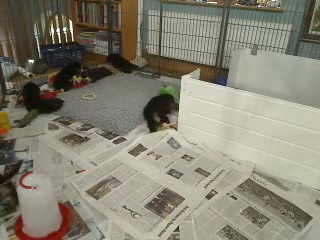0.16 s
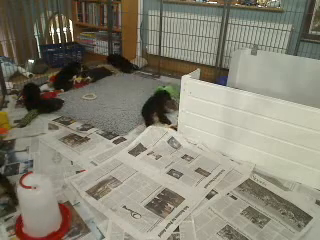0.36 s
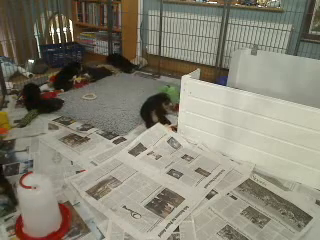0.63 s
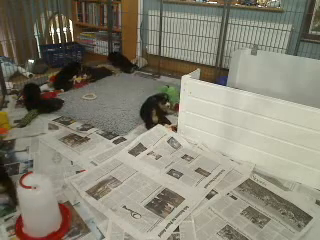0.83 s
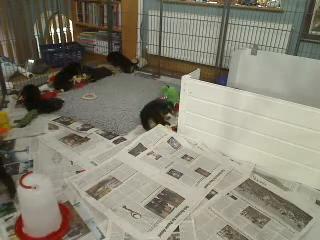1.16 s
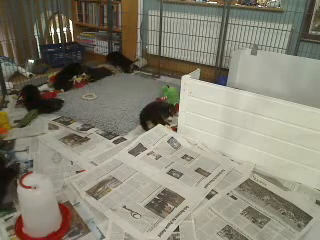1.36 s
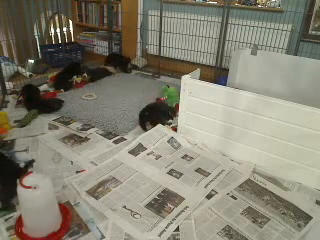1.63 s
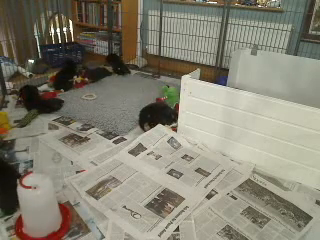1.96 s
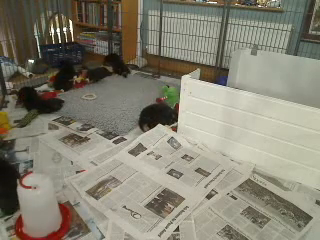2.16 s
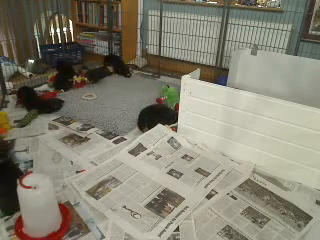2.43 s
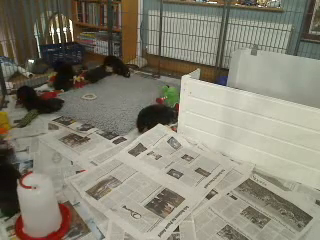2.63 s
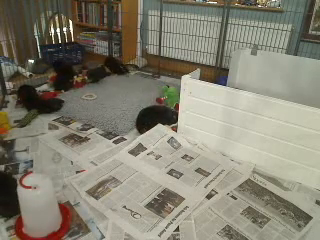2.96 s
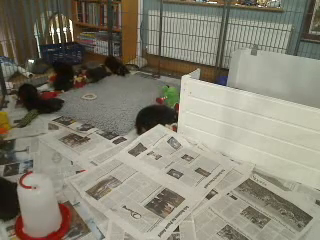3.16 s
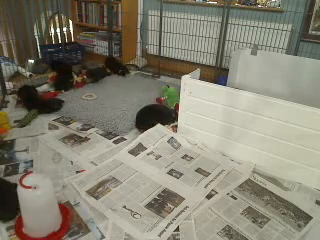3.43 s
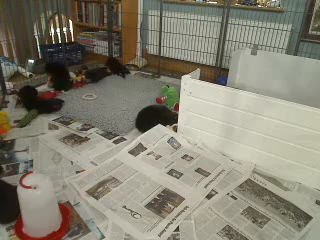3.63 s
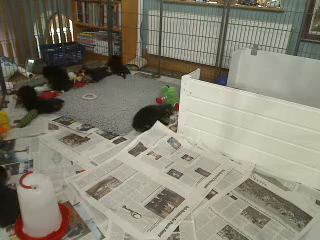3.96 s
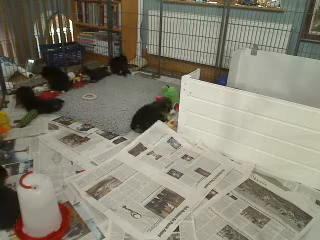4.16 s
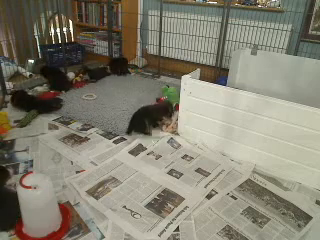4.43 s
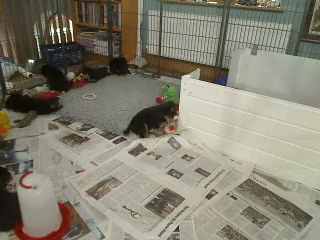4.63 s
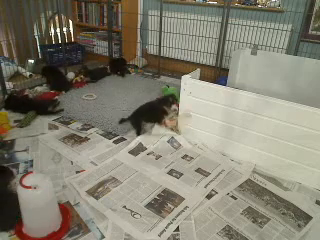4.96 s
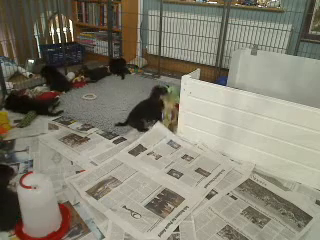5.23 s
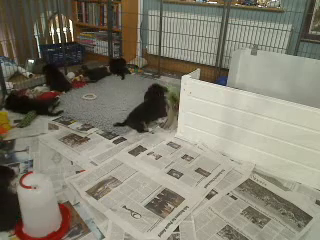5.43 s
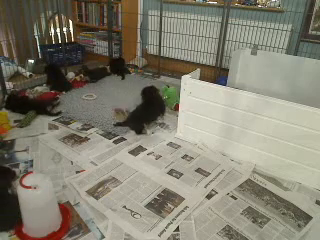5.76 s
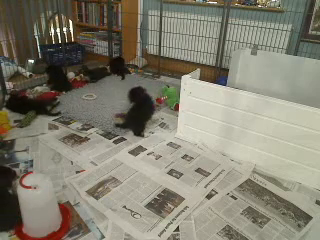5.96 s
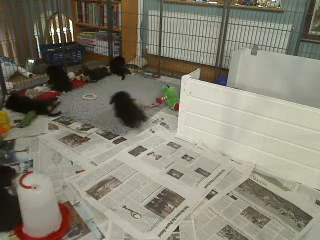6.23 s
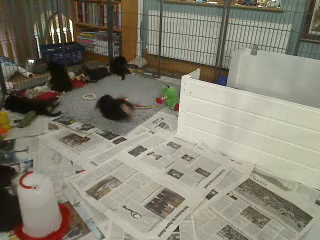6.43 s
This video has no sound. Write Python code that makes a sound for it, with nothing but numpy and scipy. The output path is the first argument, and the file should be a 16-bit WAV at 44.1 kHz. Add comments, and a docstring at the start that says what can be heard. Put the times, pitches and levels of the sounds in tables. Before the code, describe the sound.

Newspaper rustles and snaps under small paws as a puppy gives thin whines, one piercing falling yelp, a short moan and two low whimpers indoors.

```python
"""In a pen in a furnished room a young puppy cries six times: two whines, a loud yelp that cracks and slides down,
a moan and two low whimpers. Each cry is a sum of vocal-fold harmonics shaped by mouth and throat resonances.
Paws scuff the newspaper on the floor (coloured grains and friction noise), with snaps and knocks (resonant bursts).
The litter stirs softly (coloured noise) over steady room tone and a faint mains hum (a sine)."""
import sys
import numpy as np
from scipy import signal
from scipy.fft import rfft, irfft, next_fast_len
from scipy.io import wavfile
from scipy.ndimage import uniform_filter1d, map_coordinates

SR = 44100
rng = np.random.default_rng(int(sys.argv[2]) if len(sys.argv) > 2 else 0)


def bounce(signal):
    """Save signal as a 16-bit WAV file at the path given by the first command-line argument."""
    frames = np.transpose(np.atleast_2d(signal))
    limited = np.clip(frames, -1, 1)
    pcm = np.round(limited * 32767).astype(np.int16)
    wavfile.write(sys.argv[1], SR, pcm)


N = 290089
TIME = np.arange(N) / SR

# Spectrum of the room tone. Each row: frequency in Hz, relative density in dB per Hz.
AIR = [(30, -45.5), (55, -17.5), (75, -17.5), (120, -14), (180, -5.5), (300, -1.5), (600, -8.5),
       (1200, -11), (2500, -21.5), (5000, -32.5), (10000, -41)]
AIR_DB = -67.5
HUM_HZ, HUM_DB = 99.5, -70.5

# The rest of the litter stirring on blanket and paper. Each row: time in seconds, level in dB before flicker.
STIR = [(0, -62.5), (.6, -64), (.8, -68.5), (1.2, -61.5), (1.7, -65), (4.2, -60.5), (5.45, -62.5),
        (5.75, -69.5), (5.97, -70.5), (6.58, -60)]
# Spectrum of the stirring. Each row: frequency in Hz, relative density in dB per Hz.
STIR_COLOUR = [(30, -54), (60, -26), (130, -3.5), (200, 1.5), (280, -4.5), (400, 1), (700, -3), (1300, -10),
               (2500, -13.5), (4500, -16), (7000, -21.5), (10000, -36.5)]

# Reverberation of the room. Each row: frequency in Hz, time to decay by 60 dB in seconds.
ROOM_T60 = [(500, 0.37), (1500, 0.39), (4000, 0.25), (9000, 0.047)]

# Soft knocks of paws and toys. Each row: start in seconds, peak of the direct sound in dB, centre in Hz.
KNOCKS = [(.333, -45, 1480), (1.135, -53, 158), (2.345, -47.5, 840), (4.01, -52, 230), (4.426, -53, 180),
          (5.219, -54, 170)]
# Single snaps of the paper. Each row: start in seconds, peak of the direct sound in dB, centre in Hz.
SNAPS = [(.0375, -41.5, 4230), (.4485, -43, 2030), (.8907, -46.5, 4320), (1.4706, -42, 2990),
         (1.8677, -46.5, 3660), (4.149, -46, 2745), (4.559, -46, 2780), (4.684, -43.5, 4720),
         (4.861, -39.5, 2680), (5.2206, -52, 2260), (5.2804, -44, 4110), (6.3723, -32.5, 5660),
         (6.3807, -32.5, 5740), (6.4094, -33, 2930)]
# Spectrum of rubbed newspaper, before tilt. Each row: frequency in Hz, relative density in dB per Hz.
PAPER = [(290, -37.5), (500, -15), (1050, -9.5), (1640, -4), (1980, -2.5), (2670, 1.5), (2990, -2.5),
         (3930, -1), (5370, -4), (5790, -4), (9910, -15), (12900, -70), (21800, -120)]
# Paw strokes on newspaper. Each row: peak time in seconds, level at the peak in dB, swell in seconds,
# fade in seconds (both to 20 dB down), crispness as treble tilt in dB per octave.
STROKES = [(.008, -49, 0.13, 0.095, -3.5), (.228, -61.5, 0.038, 0.0544, 3.5), (.362, -65, 0.035, 0.1, 0),
           (0.465, -52.5, 0.061, 0.047, 0.5), (.575, -62.5, 0.1, 0.18, -5), (1.426, -60, 0.014, 0.034, 12),
           (1.484, -47.5, 0.031, 0.044, -0.5), (1.575, -52.5, 0.031, 0.029, 1),
           (1.782, -59, 0.017, 0.037, 1), (4.26, -67, 0.21, 0.059, 8.5), (4.395, -60.5, 0.071, 0.099, 5),
           (4.566, -47.5, 0.019, 0.035, -2.5), (4.87, -50, .1, .12, 1), (4.974, -50, 0.029, 0.028, .5),
           (5.15, -72.5, .1, 0.16, 5), (5.312, -53.5, 0.078, .06, -5), (5.48, -72.5, 0.14, 0.22, 5.5),
           (6.009, -63, .015, 0.12, 1), (6.205, -69.5, .02, 0.023, 24), (6.33, -58.5, 0.068, .08, 10.5),
           (6.379, -39.5, 0.031, 0.1, 2.5), (6.421, -48.5, 0.029, 0.078, -0.5)]

# Main resonance of the mouth. Each row: frequency in Hz before the shift of the cry, relative gain in dB.
MOUTH = [(850, -10.5), (1050, -3), (1350, 7.5), (1550, -1.5), (1750, -9), (2000, -30.5), (2400, -27.5),
         (3500, -96.5)]
# Upper resonances of the throat. Each row: frequency in Hz, relative gain in dB.
EDGE = [(1900, -41.5), (2600, -18.5), (3000, -2.5), (3500, 2.5), (4200, 3), (4700, 2), (5250, 2),
        (5800, -5.5), (6700, -19), (7300, -40), (9000, -76)]
# Spectrum of the rasp of the voice. Each row: frequency in Hz, relative density in dB per Hz.
RASP = [(600, -46), (1000, -19), (1500, 9), (1800, -1.5), (2300, 5), (2700, -3.5), (3300, -5), (4400, 3.5),
        (5200, -32), (6800, -7.5), (7600, -56.5), (10000, -64)]

# The course of each of the six cries. Each row: time in seconds, pitch in Hz, level in dB before the common
# trim in puppy(), mouth opening as overtones over fundamental in dB.
FALLING_WHINE = [(1.01, 763, -64, -6), (1.055, 824, -58, 2), (1.07, 873, -49.5, -4), (1.098, 837, -62.5, 0),
                 (1.12, 780, -42.5, -3), (1.165, 648, -48.5, -11), (1.232, 513.5, -44.5, -4.5),
                 (1.41, 500.6, -44.5, -10.5), (1.485, 443.7, -48, 3)]
THIN_WHINE = [(1.875, 754, -50.5, 11), (1.92, 850, -51.5, 3), (1.99, 930, -55, -0.5),
              (2.025, 847, -35, 6.5), (2.075, 800, -45, 16.5), (2.17, 813.6, -45, 3.5),
              (2.195, 742.5, -52, -1.5), (2.222, 803, -48.5, -8)]
YELP = [(2.428, 1054, -36.5, 11.5), (2.448, 1093, -28, 3.5), (2.468, 1200, -24, 11), (2.493, 1113, -41, -4),
        (2.52, 1105, -29.5, 9.5), (2.55, 997, -27.5, 19), (2.65, 888.5, -31, 9), (2.74, 854, -29, 5.5),
        (2.8, 834, -43.5, 2.5), (2.84, 785.5, -30.5, -6), (2.9, 745.7, -37.5, -1),
        (2.96, 734.3, -31, -14.5), (3.0, 671, -39, -3), (3.05, 617, -35.5, -13.5),
        (3.12, 568.6, -49, -17.5)]
MOAN = [(3.315, 681, -51, -1), (3.37, 861, -45.5, -12), (3.42, 707, -42.5, -8), (3.458, 667.6, -38.5, -1),
        (3.505, 655, -51, 2), (3.555, 674, -36, -9), (3.595, 749, -43.5, -13.5), (3.635, 687, -39.5, -15),
        (3.695, 686, -55.5, -25)]
WHIMPER = [(3.845, 591, -53, -19), (3.89, 547, -43.5, -17), (3.935, 571, -43.5, -25), (3.97, 565, -58, -19),
           (4.0, 547.7, -38.5, -26), (4.03, 495, -50.5, -4), (4.08, 542, -54, -19)]
LAST_WHIMPER = [(4.48, 544, -48, -18), (4.52, 517, -62.5, -11), (4.56, 536.3, -39.5, -11.5),
                (4.59, 478.3, -53, -29), (4.617, 494, -42, -25), (4.64, 514.6, -60, -9),
                (4.672, 521.7, -45, -18.5), (4.735, 519.3, -48, -18), (4.765, 494, -63, -9)]
# The cries. Each row: course, steady hoarseness as a share of the pitch (before jitter scaling), top level of the
# bright edge in dB (before flare and trim), edge swell in seconds, tiring of the edge in dB per second,
# mouth resonance shift in octaves.
CRIES = [(FALLING_WHINE, 0.0065, -59, 0.081, 16, 0.023), (THIN_WHINE, 0.006, -44.5, 0.067, 9.4, .03),
         (YELP, .004, -27.5, .008, 15, .01), (MOAN, .009, -51, 0.044, 38, .02),
         (WHIMPER, 0.02857, -70.5, 0.018, 3, -0.0096), (LAST_WHIMPER, 0.0269, -61, .02, 2.7, -0.15)]
CRY_ATTACK_S, CRY_RELEASE_S = .008, 0.014

# The folds shake more while the pitch slides, and falter towards the end of a cry.
GLIDE_HOARSENESS, FULL_GLIDE_OCTAVES_PER_S = .022, 5.0
FALTER_HOARSENESS, FALTER_SHARE = .025, .1   # the share of the cry over which faltering grows e-fold
# The bright edge follows the overtones in part, rises with pitch and flares as the folds falter.
EDGE_FOLLOWS, EDGE_DB_PER_OCTAVE, EDGE_FLARE_DB = 0.55, 7.5, 8
# A closing mouth thins the edge: treble tilt in dB per octave for each dB short of wide open.
EDGE_THINS, WIDE_OPEN_DB = 0.16, 10

# Second tone in the yelp. Each row: start in seconds, attack in seconds to 20 dB down, length in seconds,
# pitch in Hz, level of the tone's fundamental in dB, level of the rasp in dB.
CRACKS = [(2.425, 0.0044, 0.0023, 1300, -40, -50.5), (2.477, .015, 0.039, 1482, -25, -24)]
CRACK_RELEASE_S = 0.04   # to 20 dB down
RASP_LINGERS_DB, RASP_LINGER_S = -14.5, .25   # relative to the rasp; to 20 dB down

CUTOFF_HZ = 10100


def from_db(db):
    """Decibel definition: amplitude ratio from level."""
    return 10 ** (np.asarray(db) / 20)


def rms_one(x):
    """Power normalisation: scales a signal to rms 1."""
    return x / np.sqrt(np.mean(x ** 2) + 1e-20)


def at_hz(points, hz):
    """Logarithmic frequency scale: reads a table by interpolation along octaves."""
    table = np.array(points)
    return np.interp(np.log(np.maximum(hz, 1)), np.log(table[:, 0]), table[:, 1])


def drift(rate, size):
    """Band-limited chance: smooth random motion with about `rate` turns a second and spread near 1."""
    knots = rng.standard_normal(8192)
    return 1.1 * map_coordinates(knots, [np.arange(size) * rate / SR], order=2, mode="wrap")


def coloured(x, spectrum):
    """Linear filtering: weights the frequencies of a sound by a spectrum; rms 1."""
    size = next_fast_len(len(x) + 2048)
    hz = np.arange(size // 2 + 1) * SR / size
    filtered = irfft(rfft(x, size) * from_db(at_hz(spectrum, hz)), size)
    return rms_one(filtered[:len(x)])


def resonate(x, hz, width_hz):
    """Simple resonator: one pole pair, whose bandwidth sets its damping; gain about 1 on top."""
    r = np.exp(-np.pi * width_hz / SR)
    numerator = np.array([1, 0, -1]) * (1 - r * r) / 2
    return signal.lfilter(numerator, [1, -2 * r * np.cos(2 * np.pi * hz / SR), r * r], x)


def swell(s, hold_s, attack_s, release_s):
    """Exponential envelope: an event's samples and gain; attack and release are the times to 20 dB down."""
    at = np.flatnonzero((TIME > s - 2 * attack_s) & (TIME < s + hold_s + 2 * release_s))
    t = TIME[at] - s
    rise = np.maximum(-t, 0) / attack_s
    fall = np.maximum(t - hold_s, 0) / release_s
    return at, from_db(-20 * (rise + fall))


def background(flicker_db=2.0):
    """Incoherent addition: the litter's flickering noise over steady room tone and a sine of mains hum."""
    stir_db = np.interp(TIME, *np.transpose(STIR)) + flicker_db * drift(25, N)
    stir = from_db(stir_db) * coloured(rng.standard_normal(N), STIR_COLOUR)
    air = from_db(AIR_DB) * coloured(rng.standard_normal(N), AIR)
    hum = from_db(HUM_DB) * np.sqrt(2) * np.sin(2 * np.pi * HUM_HZ * TIME)
    return stir + air + hum


def room(x, wet_db, first_echo_s=0.0056):
    """Reverberant decay: dense echoes from pen walls and furniture, whose treble dies first."""
    t, edges = TIME[:SR // 2], np.geomspace(80, 12000, 8)   # band edges in Hz
    white, tail = rng.standard_normal((2, len(t))), 0
    for k, (low, high) in enumerate(zip(edges, edges[1:])):
        band_pass = signal.butter(2, [low, high], "band", fs=SR, output="sos")
        band = signal.sosfilt(band_pass, white[k % 2])
        t60 = at_hz(ROOM_T60, np.sqrt(low * high))
        decay = from_db(-60 * t / t60) * (t > first_echo_s)
        tail = tail + band * decay / np.sqrt(np.sum(decay ** 2))
    return x + from_db(wet_db) * signal.fftconvolve(x, tail)[:N]


def taps(rows, t60, width_share):
    """Impulse excitation: each contact is a short decaying burst in one broad resonance."""
    out, t = np.zeros(N + SR), TIME[:SR // 8]
    noises = rng.standard_normal((len(rows), len(t)))
    for (s, peak_db, hz), noise in zip(rows, noises):
        burst = noise * from_db(-60 * t / t60)
        for _ in range(2):
            burst = resonate(burst, hz, hz * width_share)
        start = max(round(s * SR), 0)
        out[start:start + len(t)] += from_db(peak_db) * burst / np.abs(burst).max()
    return out[:N]


def shuffles(grains_per_s=1300, size_db=1.4, friction=0.61, clump_db=1.5):
    """Crackling noise: tiny creases of paper give way in clumps under a paw, over a hiss of friction."""
    sizes = from_db(size_db * np.minimum(rng.exponential(1, N), 3)) * rng.choice([-1, 1], N)
    grains = rms_one(sizes * (rng.random(N) < grains_per_s / SR))
    clumps = from_db(clump_db * drift(160, N))
    crackle = (grains + friction * rng.standard_normal(N)) * clumps
    out = np.zeros(N)
    for s, peak_db, swell_s, fade_s, tilt in STROKES:
        at, push = swell(s, 0, swell_s, fade_s)
        colour = [(hz, db + tilt * np.log2(hz)) for hz, db in PAPER]
        out[at] += push * from_db(peak_db) * coloured(crackle[at], colour)
    return out


def folds(pitch, hoarse, jitter=0.88, jitter_rate=700, quaver_rate=90, shimmer_db=150):
    """Harmonic source: fold harmonics, one a row, and their frequencies; hoarseness shakes pitch and loudness."""
    size = len(pitch)
    shake = jitter * drift(jitter_rate, size) + drift(quaver_rate, size)
    phase = 2 * np.pi * np.cumsum(pitch * (1 + hoarse * shake)) / SR
    k = np.arange(1, 15)[:, None]
    waves = np.sqrt(2) * np.sin(k * phase + rng.uniform(0, 2 * np.pi, k.shape))
    # shimmer_db is the depth per unit of hoarseness
    shimmer = from_db(shimmer_db * np.minimum(hoarse, .02) * np.tanh(drift(quaver_rate, size)))
    return waves * shimmer, k * pitch


def blend(waves, gains):
    """Power summation: weighted sum of harmonics, evened to rms about 1."""
    return (waves * gains).sum(0) / np.sqrt((gains ** 2).sum(0))


def course(rows):
    """Piecewise-linear control: the samples of a cry, its attack and release gate, and its controls."""
    s, *columns = np.transpose(rows)
    at = np.flatnonzero((TIME >= s[0] - CRY_ATTACK_S) & (TIME <= s[-1] + CRY_RELEASE_S))
    attack = (TIME[at] - s[0]) / CRY_ATTACK_S
    release = (s[-1] - TIME[at]) / CRY_RELEASE_S
    gate = np.clip(np.minimum(attack, release) + 1, 0, 1)
    return at, gate, [np.interp(TIME[at], s, c) for c in columns]


def sliding(t, pitch):
    """Rate of pitch change on an octave scale: 0 on a held note, 1 in a full glide."""
    glide = uniform_filter1d(np.abs(np.gradient(np.log2(pitch), t)), size=900)
    return np.minimum(glide / FULL_GLIDE_OCTAVES_PER_S, 1) ** 2


def voice(rows, steady_hoarseness, top_edge_db, edge_swell_s, tires_db_per_s, mouth_shift, flutter_db=1.5,
          tremble_db=2.0, tremble_rate=40, rasping_jitter=0.11, husk_db=-25):
    """Source-filter principle: a trembling fundamental, with overtones sliding through mouth and throat resonances."""
    at, gate, (pitch, level_db, opening_db) = course(rows)
    t = TIME[at] - TIME[at[0]]
    falter = np.exp((t / t[-1] - 1) / FALTER_SHARE)
    hoarse = steady_hoarseness + GLIDE_HOARSENESS * sliding(t, pitch) + FALTER_HOARSENESS * falter
    waves, hz = folds(pitch, hoarse)

    # opening the mouth moves the power from the fundamental into the overtones
    fundamental_db = level_db - 10 * np.log10(1 + from_db(opening_db) ** 2)
    mouth_db = fundamental_db + opening_db
    edge_db = (top_edge_db + EDGE_FOLLOWS * (mouth_db - mouth_db.max())
               + EDGE_DB_PER_OCTAVE * np.log2(pitch / pitch.max())
               - tires_db_per_s * t + EDGE_FLARE_DB * falter)

    fundamental = waves[0] * from_db(tremble_db * drift(tremble_rate, len(at)))
    mouth = blend(waves[1:], from_db(at_hz(MOUTH, hz[1:] / 2 ** mouth_shift)))
    # always a little husky, the voice breaks into a rasp at its hoarsest
    rasp_gain = from_db(husk_db) + (hoarse / rasping_jitter) ** 2
    mouth = mouth + rasp_gain * coloured(rng.standard_normal(len(at)), RASP)

    # each high overtone swells and fades on its own as the head moves
    flutter = flutter_db * np.array([drift(18.87, len(at)) for _ in hz[2:]])
    thinning = EDGE_THINS * (WIDE_OPEN_DB - opening_db) * np.log2(hz[2:] / hz[2])
    edge = blend(waves[2:], from_db(at_hz(EDGE, hz[2:]) + thinning + flutter))
    edge = edge * np.minimum(t / edge_swell_s, 1) ** 2

    out = np.zeros(N)
    out[at] = gate * (from_db(fundamental_db) * fundamental + from_db(mouth_db) * mouth + from_db(edge_db) * edge)
    return out


def puppy(level_db=-1.0):
    """Superposition: all six cries under one common trim."""
    return from_db(level_db) * sum(voice(*cry) for cry in CRIES)


def crack(cries, second_db=-15, third_db=-13, hoarse=.024, beating_db=-4.5):
    """Intermodulation: the folds break into a second tone that beats with the voice, and a rasp lingers."""
    out = np.zeros(N)
    for s, attack_s, length_s, hz, tone_db, rasp_db in CRACKS:
        at, gain = swell(s, length_s, attack_s, CRACK_RELEASE_S)
        waves, _ = folds(np.full(len(at), hz), hoarse)
        tone = waves[0] + from_db(second_db) * waves[1] + from_db(third_db) * waves[2]
        # the product of two tones holds their sum and difference frequencies
        beating = from_db(beating_db) * rms_one(cries[at] * waves[0])
        pulsed_noise = rng.standard_normal(len(at)) * (1 + 0.31 * waves[0])
        rasp = coloured(pulsed_noise + beating, RASP)
        out[at] += gain * (from_db(tone_db) * tone + from_db(rasp_db) * rasp)

        at, gain = swell(s, length_s, attack_s, RASP_LINGER_S)
        lingering = coloured(rng.standard_normal(len(at)), RASP)
        out[at] += gain * from_db(rasp_db + RASP_LINGERS_DB) * lingering
    return out


def scene():
    """Superposition: paws and puppy sound in the room, over its background."""
    snaps = taps(SNAPS, t60=0.039, width_share=0.48)
    knocks = taps(KNOCKS, t60=0.062, width_share=0.56)
    paws = room(shuffles() + snaps + knocks, wet_db=-7.5)
    cries = puppy()
    cries = room(cries + crack(cries), wet_db=-4.0)
    return (background() + paws + cries)[None]


def record(dry):
    """Low-pass filtering: an elliptic filter cuts the top steeply."""
    low_pass = signal.ellip(10, .2, 70, CUTOFF_HZ, fs=SR, output="sos")   # ripple, stop-band depth in dB
    return signal.sosfilt(low_pass, dry)


dry = scene()
out = record(dry)
bounce(out)
```